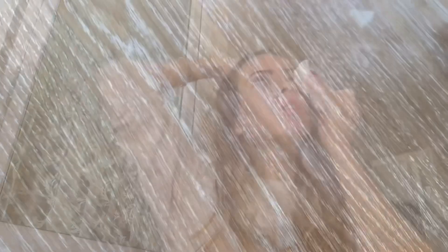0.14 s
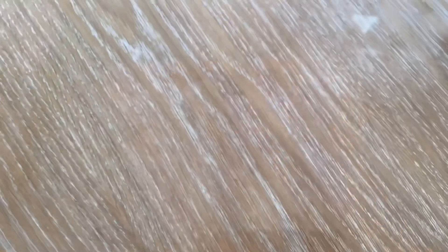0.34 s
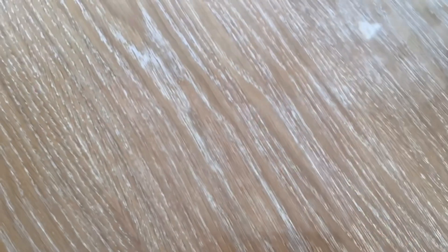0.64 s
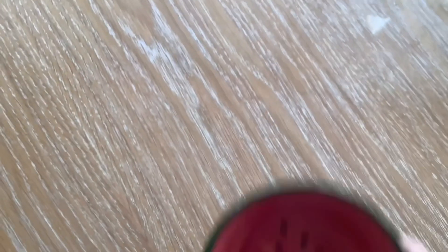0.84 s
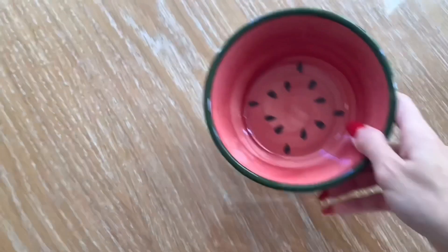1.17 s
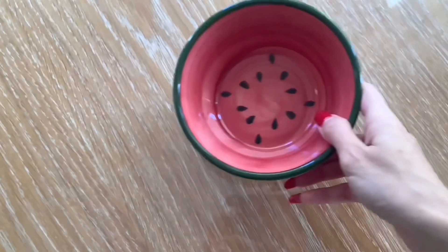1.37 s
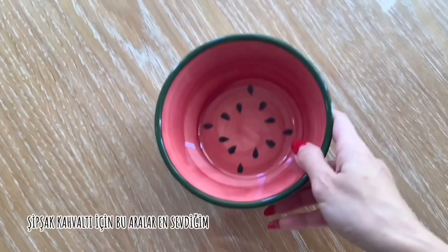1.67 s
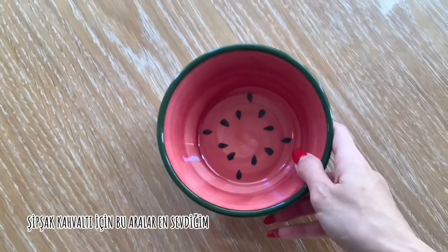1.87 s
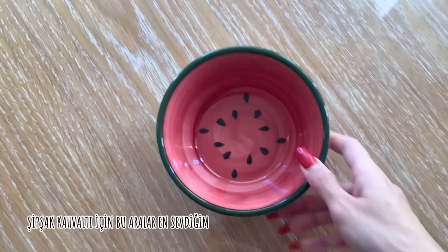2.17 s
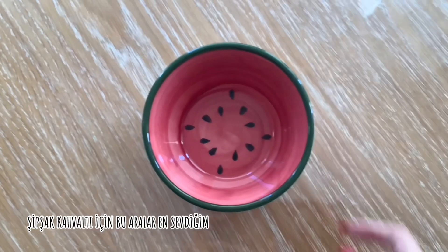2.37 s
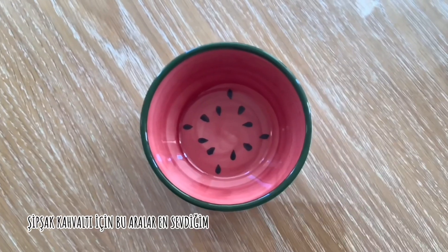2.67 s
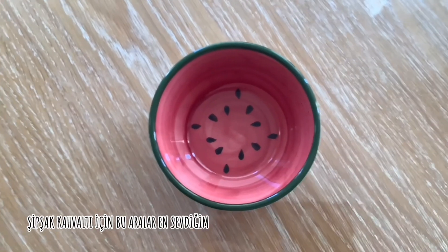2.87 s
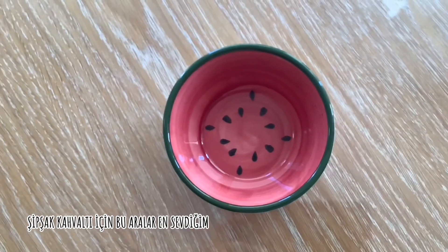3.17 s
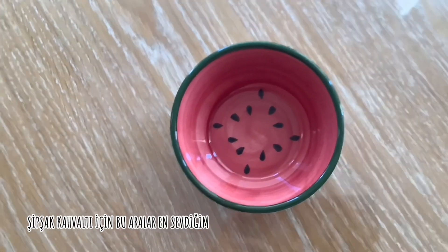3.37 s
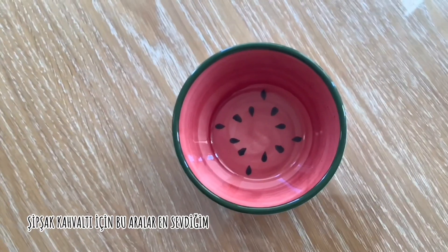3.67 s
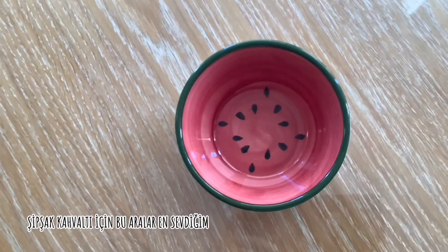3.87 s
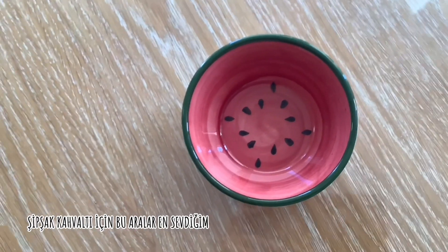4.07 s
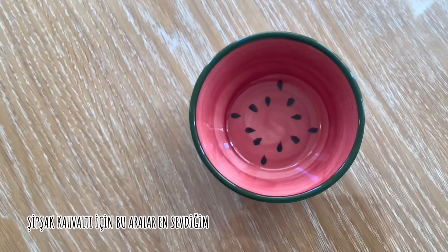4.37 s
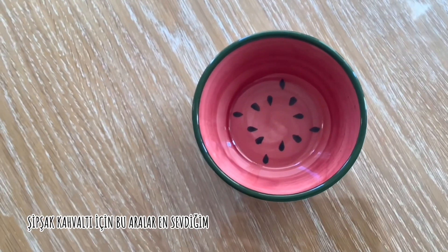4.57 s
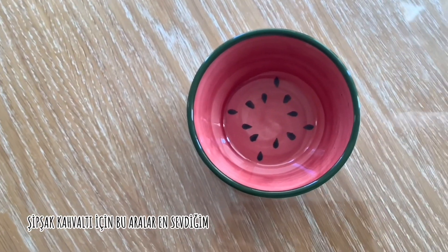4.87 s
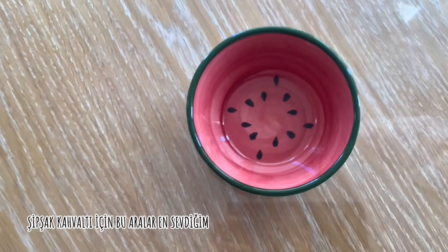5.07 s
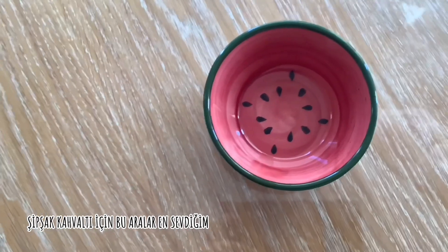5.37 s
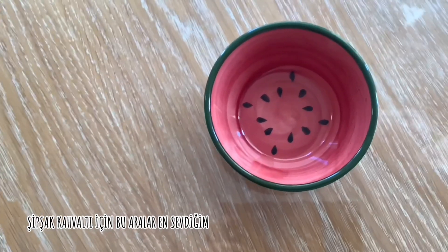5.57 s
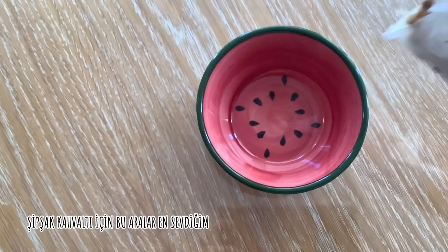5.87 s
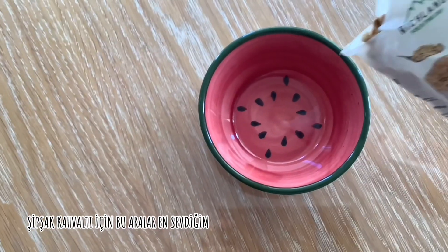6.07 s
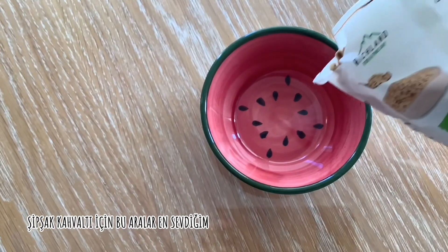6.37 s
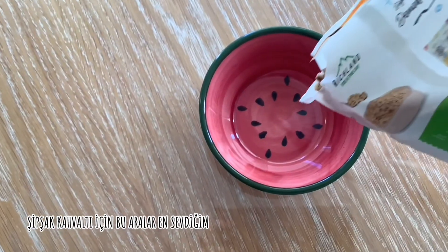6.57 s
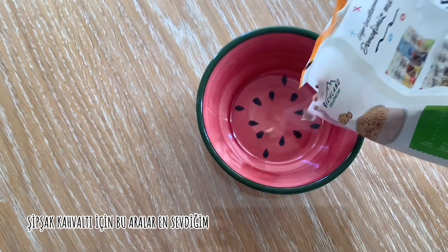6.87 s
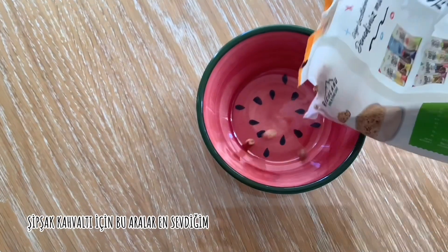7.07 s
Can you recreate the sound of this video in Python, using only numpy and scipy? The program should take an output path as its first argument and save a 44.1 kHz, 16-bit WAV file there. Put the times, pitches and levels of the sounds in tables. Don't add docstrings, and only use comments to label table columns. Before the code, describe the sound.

Dry, close handling on wood: a brief finger drag, hollow taps, a nail click and soft sleeve rustle. Two fuller thuds of a bowl spread into the kitchen, then one strong knock and weaker ones. Crisp plastic film bursts into crackles and pops, subsides to sparse crinkles, then swells again with tiny ceramic pings. Low house rumble, thin hiss and faint lens-motor ticking lie underneath, captured by a handheld phone.

```python
import sys
import numpy as np
from scipy import signal
from scipy.fft import rfft, irfft
from scipy.io import wavfile
from scipy.ndimage import uniform_filter1d

SR = 44100
rng = np.random.default_rng(int(sys.argv[2]) if len(sys.argv) > 2 else 0)


def rack_gain(trim_db):
    fader = np.asarray(trim_db, float)
    return 10 ** (fader / 20)


def dump(signal):
    limited = np.clip(np.atleast_2d(signal).T, -1, 1)
    pcm = np.round(limited * 32767).astype(np.int16)
    wavfile.write(sys.argv[1], SR, pcm)


N = 318843
TIME = np.arange(N) / SR

# start in seconds, peak in dB, crack in relative dB, body in Hz,
# lower panel in relative dB.
THUDS = [
    (1.695, -11, -28, 288, -13),
    (1.942, -9.5, -23, 343, 14.5),
    (4.06, -36, -56, 272, 27),
    (4.355, -32, -55, 263, 0),
]
# frequency in Hz, level in dB per Hz.
THUD_BODY = [(50, -32.5), (90, -25.5), (200, -21.5), (340, -15.5), (590, -5.5), (800, -21), (1100, -17.5),
             (1450, -26.5), (1900, -41), (4000, -45), (8000, -83)]
# frequency in Hz, level in dB, T60 in seconds.
PANEL_MODES = [(124.2, 0, 0.76), (208, -18.5, 0.57), (268, -12.5, 0.97), (330, -8, 0.75),
               (390, -21.5, 0.28), (506, -9, 0.42), (568, 5.5, 0.1), (108, -26, 0.5), (860, -24, 0.48),
               (2060, -21, 0.09), (1440, -44, 0.28), (7250, -32, 0.066)]
# start in seconds, peak in dB, body in Hz, crack in relative dB,
# freedom (1 finger bounces off, 0 stays pressed).
RAPS = [(0.911, -23, 400, -25.5, 0.98), (1.0882, -16, 534, -7, 1.4), (1.199, -28, 273, -17, 0.83),
        (1.4625, -26.5, 264, -33, 0.57), (2.3808, -5, 468, -49, 1.13), (2.787, -36.5, 250, -33, .9),
        (2.939, -51, 400, -27, 0.8), (3.42, -42.5, 350, -25, .9), (3.2785, -21.5, 312, -16, 0.87),
        (3.361, -16.5, 375, -40, 1.12), (4.4907, -20.5, 352, -31, 0.79), (5.2308, -26, 447, -13, 0.35),
        (5.3045, -44, 300, -30, .6), (5.3205, -27, 312, -29, 0.19), (6.673, -37.5, 323, -9, 0.73),
        (7.219, -33.5, 836, -14, .9)]
# start in seconds, peak in dB, body in Hz, crack in relative dB.
BUMPS = [(0.811, -35, 300, -5), (0.93, -29, 290, -32), (0.803, -47.5, 510, 1), (0.873, -44, 352, -22),
         (1.14, -46, 299, -29), (1.324, -36, 314, -11.5), (2.221, -32, 256, -22),
         (2.546, -28.5, 454, -62.5), (3.236, -36.5, 370, -17), (4.6145, -25.5, 264, -17),
         (5.158, -46.5, 302, -4), (1.092, -26, 231, -27), (5.335, -40, 167, -36), (5.761, -42, 290, -15.5),
         (5.83, -37, 281, -39), (6.145, -41, 270, -33.5), (6.871, -32, 340, -23)]
# start in seconds, peak in dB.
DRAG = [(0.029, -43), (0.043, -35), (.057, -39), (.071, -38), (0.081, -43), (0.091, -37), (.116, -52)]
# start in seconds, peak in dB, top in relative dB.
NAILS = [(1.0913, -23.5, -9.5), (2.3837, -22.5, -10.5), (3.2843, -30, -6)]
# frequency in Hz, width in Hz, level in dB.
WOOD_MODES = [(191.5, 40, -39.5), (571, 56, -35.5), (1360, 75, -44.5), (1535, 74, -36), (1710, 84, -42),
              (2040, 130, -35), (2300, 150, -36), (2750, 220, -29), (3650, 270, -22)]
# time in seconds, rustle in dB.
BAG_RUSTLE = [(3.4, -71), (3.52, -81), (3.7, -39.5), (3.95, -47), (4.3, -44.5), (4.7, -43), (4.9, -46),
              (5.0, -57.5), (5.6, -69.5), (6.1, -74.5), (6.2, -59.5), (6.4, -48.5), (6.6, -40),
              (6.95, -39.5), (7.23, -41)]
# peak time in seconds, peak in dB, rise in dB per s, fall in dB per s.
SHAKES = [(3.608, -28.5, 189, 121), (3.83, -34.5, 194, 81), (4.065, -32.5, 500, 300),
          (4.095, -23.5, 121, 139), (4.39, -54, 108, 112), (4.462, -29, 1100, 1300),
          (4.478, -38, 3000, 1100), (4.614, -36, 1100, 1200), (5.72, -53.5, 398, 53.5),
          (6.428, -50, 900, 250), (6.66, -40.5, 79, 63), (7.1, -40.5, 92, 7)]
# frequency in Hz, level in dB per Hz.
FILM_SPECTRUM = [(300, -1.5), (500, -4), (900, -1.5), (1500, 2.5), (2000, 4), (2500, 4.5), (3300, -0.5),
                 (4500, -2), (5800, -1), (8000, 2), (9800, -4), (11500, -16), (14000, -24), (16000, -30)]
# start in seconds, peak in dB, treble in relative dB, bass in relative dB.
SNAPS = [(3.482, -37, -6, -27), (3.5108, -27, -8, -8), (3.546, -17.5, -7, -18), (3.6353, -14.5, -6, -41),
         (3.8135, -24, -7.5, -31), (3.8212, -29, -12, -24), (3.8538, -12.5, -7, -9), (3.8562, -22, -4, -18),
         (3.893, -8, -2.5, -12), (3.8949, -20.5, 4.5, -17), (3.9802, -20.5, -8, -15),
         (4.0584, -20, -6, -12), (4.0616, -12, -4, -20), (4.0978, -13, -10, -10), (4.106, -18, 2, -14),
         (4.2598, -16.5, -6, -9), (4.3644, -22, -4, -11), (4.365, -15.5, 5, -4), (4.4606, -34, -2, -21),
         (4.4749, -11.5, -2, -17), (4.498, -25, 4, -2), (4.5646, -31, -12, -32), (4.608, -29, -6, -16),
         (4.6168, -26, -12, -22), (4.7421, -26, -5, -20), (4.927, -44, -8, -13), (5.041, -35, -11, -4),
         (5.4107, -41.5, -8, -30), (5.456, -38.5, -12, -6), (5.561, -42, -5, -14), (5.6968, -24, -9, -1.5),
         (5.6994, -23, -32, -4), (5.7847, -33, -34, -23), (6.1725, -37.5, -4.5, 2.5), (6.4226, -35, 8, 2),
         (6.5204, -32, 5, 3), (6.5384, -27, 5, -36), (6.613, -39, -6, -15), (6.6306, -15, -12, -6),
         (6.6335, -15, -1.5, -13.5), (6.717, -42, -4, -6), (6.9624, -35, 6, -9), (7.004, -23, -17, -12),
         (7.0823, -27, -10, -15), (7.088, -32, 11, -9), (7.111, -23, -12, -7.5)]
# start in seconds, peak in dB.
CRINKLES = [(3.591, -17.5), (4.0881, -12), (4.34, -40), (5.189, -41), (5.532, -52), (5.62, -61),
            (5.664, -54), (5.82, -46), (5.916, -45), (6.2375, -39), (6.2248, -52), (4.936, -39), (6.6, -48),
            (6.727, -40)]
# start in seconds, peak in dB.
PRICKS = [(3.486, -47), (3.576, -32), (3.7926, -41), (4.044, -30), (4.35, -44), (4.831, -43), (4.877, -38),
          (6.2058, -59), (6.287, -43), (6.3061, -48), (6.3161, -41), (6.333, -45), (6.356, -43),
          (6.3899, -43), (6.3969, -40), (6.417, -31.5), (6.4575, -42), (6.4852, -45), (6.5034, -39),
          (6.5265, -36), (6.8898, -44), (6.977, -28), (6.997, -33), (7.119, -36)]
# start in seconds, peak in dB, pitch in
# Hz, T60 in seconds.
POCKETS = [(3.8135, -23, 2100, .006), (3.8212, -15, 2310, 0.0053), (4.088, -34, 13000, .006),
           (4.3655, -12, 8800, 0.0051), (4.459, -27, 2300, .03), (4.6165, -25, 2360, 0.02),
           (6.6302, -13.5, 2240, 0.013), (6.769, -52, 14500, .02), (6.801, -42, 4400, .035),
           (6.8225, -52, 15000, .015), (6.9618, -43, 14600, .01), (7.086, -30, 3900, 0.024),
           (7.1112, -22, 2190, .008), (7.104, -32, 4700, .02)]
# start in seconds, tick peak in dB, strikes on the 4.7, 7.3 and 9.3 kHz rings in dB.
PUFFS = [(6.772, -38, -65, -57, -52), (6.7994, -51, -43, -54, -62), (6.8205, -55, -18, -58, -55),
         (6.845, -40, -28, -33, -51), (6.9162, -58, -31, -30, -39), (6.9616, -28.5, -48, -29, -27),
         (7.0344, -52, -54, -61, -55.5), (7.082, -29, -20.5, -21.5, -20.5), (7.1197, -59, -38, -39, -38),
         (7.1484, -44, -23, -37, -22), (7.211, -56, -35, -40, -30)]
# frequency in Hz, level in dB, T60 in seconds, strike column (3 = only a full blow).
BOWL_MODES = [(4775, 1, .065, 0), (7290, -4, .09, 1), (7325, -5, .14, 1), (8317, -16, .08, 1),
              (9216, -7, .18, 2), (9345, -12, .17, 2), (10730, -20, .06, 2), (11250, -12, .06, 2),
              (12770, -12, .07, 3)]
# time in seconds, effort in dB.
ARM_EFFORT = [(0, -70), (.1, -66.5), (.7, -66), (1.0, -64), (1.3, -59), (1.9, -68), (2.4, -61), (2.9, -69),
              (3.5, -59.5)]
# peak time in seconds, peak in dB, dull part in relative dB.
BRUSHES = [(.55, -65.5, 1.5), (.82, -53.5, -10), (.92, -58.5, -3.5), (1.2, -60, -18), (1.65, -66, 6.5),
           (2.4, -62, -3), (2.6, -58.5, -6), (2.73, -56, -5), (3.295, -56.5, 3), (3.45, -72, 7)]
# start in seconds, peak in dB, centre in Hz.
TICKS = [(0.1321, -39, 4000), (0.1611, -42, 3120), (0.3222, -48, 8970), (0.4712, -35, 4030),
         (0.5135, -40, 9100), (0.8067, -46, 8620), (0.8829, -48, 3150), (0.966, -44, 3750),
         (1.43, -39.5, 3240), (1.6164, -51, 7800), (1.628, -41, 8900), (1.694, -39, 7250),
         (1.9435, -48, 3000), (2.116, -48, 8440), (2.2508, -51, 3350), (2.5707, -37.5, 3530),
         (2.7133, -39, 9250), (2.7833, -48, 8940), (2.8814, -57, 3270), (2.9158, -63, 9300),
         (3.3753, -44.5, 3010), (3.4356, -46, 9000), (3.452, -39, 9200)]
# time in seconds, gain in dB.
PHONE_GAIN = [(0, -1), (.8, -0.5), (1.29, 8), (1.7, -0.5), (2.3, 2.5), (3.3, 0), (4.35, 1.5), (4.6, -8.5),
              (6.4, -9), (7.23, -7)]
# frequency in Hz, level in dB per Hz.
RUMBLE_SPECTRUM = [(12, -39.5), (20, -1), (49, 8.5), (65, 15.5), (200, -5), (260, -62), (440, -120)]
# frequency in Hz, level in dB per Hz.
AIR_SPECTRUM = [(100, -8), (200, -11.5), (400, -18.5), (650, -20), (900, -23.5), (1300, -24.5), (3000, -52),
                (5500, -50.5), (9400, -46), (12000, -51), (16000, -64.5)]
# frequency in Hz, T60 in seconds.
KITCHEN_T60 = [(100, 0.6), (300, 0.55), (800, 0.41), (2000, 0.62), (6000, 0.28), (14000, 0.0683)]


def unit(x):
    return x / np.sqrt(np.mean(x ** 2))


def peak(x):
    return x / abs(x).max()


def curves(table):
    time_s, *columns = np.transpose(table)
    return [np.interp(TIME, time_s, column) for column in columns]


def band(x, lo_hz, hi_hz):
    sos = signal.butter(2, [lo_hz, min(hi_hz, .45 * SR)], "band", fs=SR, output="sos")
    return signal.sosfilt(sos, x)


def colour(x, points):
    hz, db = np.transpose(points)
    log_hz = np.log(np.arange(len(x) // 2 + 1) * SR / len(x) + 1)
    return irfft(rfft(x) * rack_gain(np.interp(log_hz, np.log(hz), db)), len(x))


def walk(rate_hz):
    hold = int(SR / rate_hz)
    steps = np.repeat(rng.standard_normal(N // hold + 1), hold)
    return uniform_filter1d(uniform_filter1d(steps, hold), hold)[:N]


def crackle(share, spread_db):
    clicks = (rng.random(N) < share) * rng.standard_normal(N)
    size_db = spread_db * np.minimum(rng.exponential(size=N), 4)
    return unit(clicks * rack_gain(size_db))


def fade(t, t60_s):
    return np.exp(-np.log(1000) * t / max(t60_s, .002))


def surge(peak_s, db, rise_db_s, fall_db_s):
    since = TIME - peak_s
    return rack_gain(2 * (db + np.minimum(rise_db_s * since, -fall_db_s * since)))


def add(out, start_s, x):
    i = max(int(start_s * SR), 0)
    out[i:i + len(x)] += x[:N - i]


def board(body_hz, crack_db, bounce_db, thump_db, ring=1):
    f, t = np.arange(2049) * SR / 4096, TIME[:4096]
    spread_s = 0.004197
    body = (f / body_hz) ** 2.25 * np.exp(-1.8 * (f / body_hz * 0.98) ** 1.346)
    crack = (f / 2000) ** 2 / (1 + (f / 2000) ** 5)
    thump = (f / 150) ** 2 / (1 + (f / 150) ** 6)
    shoulder = (f / 800) ** 2 * np.exp(-(f / 820) ** 3.1)
    push = body + rack_gain(-25.5) * shoulder + rack_gain(crack_db - 18.5) * crack + rack_gain(thump_db + 4.5) * thump
    hard = np.clip(ring * body_hz / 500, 0, 1) ** 2
    node = 1 - .93 * hard ** .6 * np.exp(-((f - 250) / 62) ** 2)
    tap = peak(irfft(push * node * np.exp(-4j * np.pi * spread_s * np.sqrt(500 * f))))
    tap = tap * np.clip(t / .0012, 0, 1) * np.clip((.08 - t) / .03, 0, 1)
    tap = tap + rack_gain(bounce_db) * np.roll(band(tap, 60, 0.95 * body_hz), int(0.0034 * SR))
    rise = (1 - np.exp(-t / spread_s)) ** 3
    for hz, width_hz, db in WOOD_MODES:
        mode = np.sin(2 * np.pi * hz * t) * rise * np.exp(-np.pi * width_hz * t)
        tap = tap + rack_gain(db + 26.5) * hard ** (hz / 500) * mode
    return tap


def thuds():
    blow, ring, t = np.zeros(N), np.zeros(N), TIME[:SR]
    waver = [rack_gain(min(hz / 60, 4.5) * walk(hz ** .5 * 1.6)) for hz, *_ in PANEL_MODES]
    for start_s, db, crack_db, body_hz, lower_db in THUDS:
        grit = rng.standard_normal(SR)
        buzz = unit(band(band(grit[::-1], 750, 2760), 700, 3200)) * fade(t, 0.28)
        add(ring, start_s, rack_gain(db + crack_db - 13) * buzz)
        grit[SR // 10] = 12
        rattle = grit * fade(abs(t - .1), 0.034) * (t >= .1)
        body = unit(colour(rattle, THUD_BODY))
        crack = unit(band(band(rattle, 650, 2900), 650, 2900))
        add(blow, start_s - .095, rack_gain(db - 6) * peak(body + rack_gain(crack_db + 8) * crack))
        add(blow, start_s, rack_gain(db) * board(body_hz, crack_db - 9.5, -1.5, -53))
        panels, start = 0, int(start_s * SR)
        for (hz, mode_db, t60_s), phase, wobble in zip(PANEL_MODES, rng.random(len(PANEL_MODES)), waver):
            level_db = mode_db + lower_db * (150 < hz < 250) + (db + 12) * (hz > 5000)
            mode = np.sin(2 * np.pi * (hz * t + phase)) * fade(t, t60_s) * (1 - np.exp(-t * hz / 1.5))
            panels = panels + rack_gain(level_db) * mode * wobble[start:start + SR]
        add(ring, start_s, rack_gain(db - 13) * panels * (1 - np.exp(-t / 0.0023)) ** 2)
    return blow, ring


def knocks():
    out = np.zeros(N)
    edge_db, pressed_edge_db = -12, 10.5
    drag = [(start_s, db, 302, -41, .9) for start_s, db in DRAG]
    bumps = [(*row, 0.31) for row in BUMPS]
    for rows, thump_db, pressed_db in (RAPS + drag, -30.5, pressed_edge_db), (bumps, -7.5, 0):
        for start_s, db, body_hz, crack_db, free in rows:
            bounce_db = edge_db + pressed_db * (1 - free)
            tap = board(body_hz, crack_db, bounce_db, thump_db, free)
            add(out, start_s + 0.001756, rack_gain(db + 3.5) * tap)
    spike = 1. * (np.arange(400) == 0)
    middle = peak(band(band(spike, 1800, 5800), 1500, 6200))
    top = peak(band(spike, 8300, 10000))
    for start_s, db, top_db in NAILS:
        add(out, start_s, rack_gain(db) * (middle + rack_gain(top_db) * top))
    return out


def film(x):
    x = colour(x, [(150, -45), *FILM_SPECTRUM])
    parts = band(x, 300, 1500), band(x, 1100, 5600), band(x, 4600, 16500)
    return [unit(part) for part in parts]


def pops():
    out, width = 0, .07
    for hz in 900, 1400, 2000, 2400, 2800, 3500, 4400, 5600, 7000, 8500, 10500:
        ring = band(crackle(hz / 5e5, 3), hz * (1 - width), hz * (1 + width))
        out = out + hz ** .5 * unit(ring)
    return unit(out)


def rustle():
    power = rack_gain(2 * curves(BAG_RUSTLE)[0]) + sum(surge(*row) for row in SHAKES)
    mid_db = 10 * np.log10(power)
    top_db = mid_db - 7 + 0.21 * (mid_db + 22)
    low_db = mid_db - 5 - 0.0032 * (mid_db + 45.5)
    grains = crackle(.25, 2.5) + rack_gain(-5) * pops() + rack_gain(-15) * crackle(.012, 3.5)
    parts = film(grains * rack_gain(1.6 * walk(120)))
    low, mid, top = (part * rack_gain(1.8 * walk(110)) for part in parts)
    on = np.clip((TIME - 3.4) / .1, 0, 1)
    return on * (low * rack_gain(low_db + 2) + mid * rack_gain(mid_db) + top * rack_gain(top_db + 4.5))


def snaps():
    out, t = np.zeros(N), TIME[:6000] - .01
    wake_db, wake_treble_db, bass_db_slight = -8.5, -3.5, -39
    prick_over_db = 14
    slight = [(*row, -5.5, bass_db_slight) for row in CRINKLES]
    slight += [(start_s, db - prick_over_db, prick_over_db, bass_db_slight) for start_s, db in PRICKS]
    first, wake = fade(t, .0045), fade(t, 0.081)
    for start_s, db, treble_db, bass_db in SNAPS + slight:
        grit = (t > 0) * rng.standard_normal(len(t))
        grit[np.argmax(t > 0)] = 3.5
        low, mid, _ = film(grit * (first + rack_gain(wake_db) * wake))
        top = film(grit * (first + rack_gain(wake_db + wake_treble_db) * wake))[2]
        top = band(top, 5100, 13000)
        snap = peak(mid) + rack_gain(bass_db) * peak(low) + rack_gain(treble_db) * peak(top)
        add(out, start_s + t[0], rack_gain(db) * snap)
    return out


def pockets():
    out, t = np.zeros(N), TIME[:3000]
    for start_s, db, hz, t60_s in POCKETS:
        pop = np.sin(2 * np.pi * hz * t) * fade(t, t60_s) * (1 - np.exp(-t / (0.058 * t60_s)))
        add(out, start_s, rack_gain(db) * pop)
    return out


def bowl():
    out, t = np.zeros(N), TIME[:SR // 2]
    rolling = rack_gain(3.5 * walk(120))
    for start_s, db, *strike_db in PUFFS:
        full_db = min(strike_db)
        strikes_db = [*strike_db, full_db]
        phases, spots_db = rng.random(len(BOWL_MODES)), 2 * rng.standard_normal(len(BOWL_MODES))
        for (hz, mode_db, t60_s, column), phase, spot_db in zip(BOWL_MODES, phases, spots_db):
            ring = np.sin(2 * np.pi * (hz * t + phase)) * fade(t, t60_s) * (1 - np.exp(-t / 0.00052))
            add(out, start_s, rack_gain(strikes_db[int(column)] + mode_db + spot_db - 11) * ring)
        clatter = rng.standard_normal(4000) * fade(t[:4000], 0.12)
        clatter = band(band(clatter, 2400, 5300), 2200, 6000)
        add(out, start_s, rack_gain(full_db + 3.5) * clatter)
        tick = rng.standard_normal(600) * fade(t[:600], .008)
        tick = band(band(tick, 6500, 12000), 6500, 12500)
        add(out, start_s, rack_gain(db + 5) * peak(tick))
    return out * rolling


def sleeve():
    arm = rack_gain(curves(ARM_EFFORT)[0]) ** 2
    bright_power, dull_power = rack_gain(-5) * arm, rack_gain(2 * -0.5) * arm
    for peak_s, db, dull_db in BRUSHES:
        brush = surge(peak_s, db, 297.5, 228)
        bright_power = bright_power + brush
        dull_power = dull_power + brush * rack_gain(2 * dull_db)
    on = np.clip((3.55 - TIME) / 0.11, 0, 1)
    flutter = rack_gain(2 * walk(61.43))
    bright = unit(band(crackle(0.33, 5.4), 6630, 10600)) * np.sqrt(bright_power)
    dull = unit(band(crackle(0.26, 0.7), 620, 3220)) * np.sqrt(dull_power)
    out = (rack_gain(-4.5) * bright + rack_gain(-0.77) * dull) * flutter * on
    for start_s, db, hz in TICKS:
        tick = band(rng.standard_normal(400) * fade(TIME[:400], .002), .6 * hz, hz + 3500)
        tick = band(tick, .3 * hz, 11000)
        add(out, start_s, peak(tick) * rack_gain(db))
    return out


def lens():
    frame_hz, first_s = 29.97, .0117
    since_s = (TIME - first_s) % (1 / frame_hz)
    step = rng.standard_normal(N) * np.exp(-since_s / .002) * rack_gain(3 * walk(30))
    gain_db = 1.8 * np.minimum(curves(PHONE_GAIN)[0], 0)
    return band(step, 7900, 10250) * rack_gain(-50 + gain_db)


def house():
    gain_db, = curves(PHONE_GAIN)
    rumble = unit(colour(rng.standard_normal(N), [*RUMBLE_SPECTRUM, (400, -50)]))
    rumble = rumble * rack_gain(-44 + gain_db + 1.6 * walk(8.4))
    air = colour(rng.standard_normal(N), [(50, -40), *AIR_SPECTRUM])
    murmur = unit(band(air, 120, 900)) * rack_gain(-52 + 0.45 * gain_db + 1.12 * walk(26))
    hiss = unit(band(air, 780, 17300)) * rack_gain(-65)
    treble_hiss = unit(band(rng.standard_normal(N), 4990, 15000)) * rack_gain(-80)
    return rumble + murmur + hiss + treble_hiss


def kitchen(x):
    t, tail = TIME[:SR], 0
    hz, t60_s = np.transpose(KITCHEN_T60)
    for lo_hz in 60 * 2. ** np.arange(8):
        decay = fade(t, np.interp(np.log(0.83 * lo_hz), np.log(hz), t60_s))
        tail = tail + band(rng.standard_normal(SR), lo_hz, 2 * lo_hz) * decay
    tail = tail * np.clip((t - .004) / 0.0022, 0, 1)
    return signal.fftconvolve(x, tail / np.sqrt(np.sum(tail ** 2)))[:N]


def scene():
    blow, ring = thuds()
    near = knocks() + bowl()
    plastic = rustle() + snaps() + pockets()
    wet = kitchen(rack_gain(-35) * near + rack_gain(-10) * plastic + rack_gain(-3) * blow)
    return (near + plastic + blow + ring + sleeve() + lens() + house() + wet)[None]


def top_cut(x):
    return signal.sosfilt(signal.butter(12, 15900, fs=SR, output="sos"), x)


def record(dry):
    low_cut = signal.butter(4, 33, "high", fs=SR, output="sos")
    mix = signal.sosfilt(low_cut, dry)
    return top_cut(mix)


dry = scene()
out = record(dry)
dump(out)
```